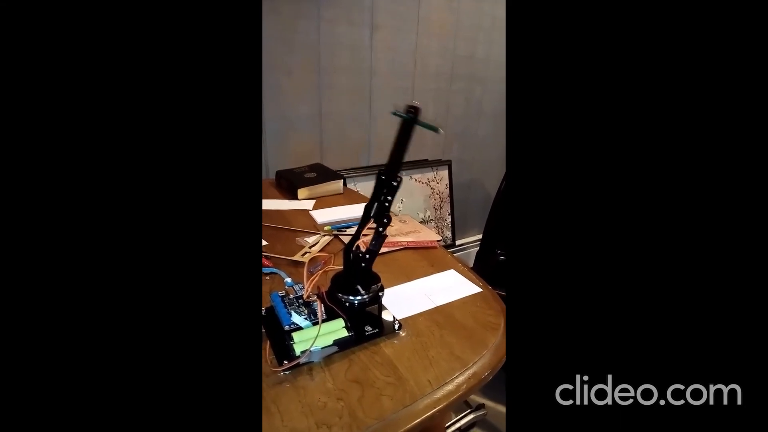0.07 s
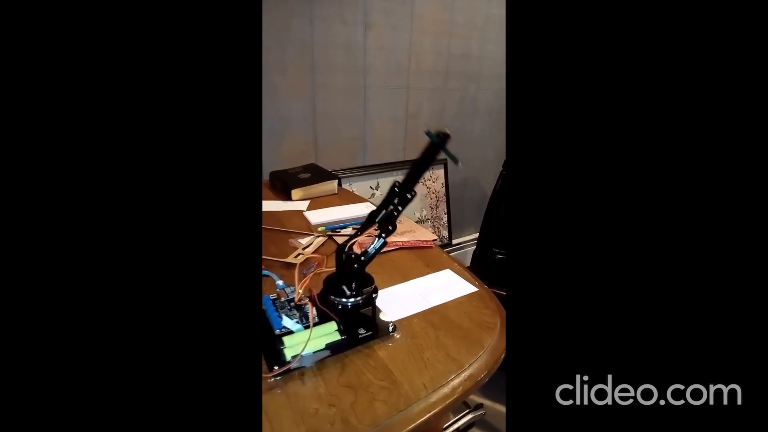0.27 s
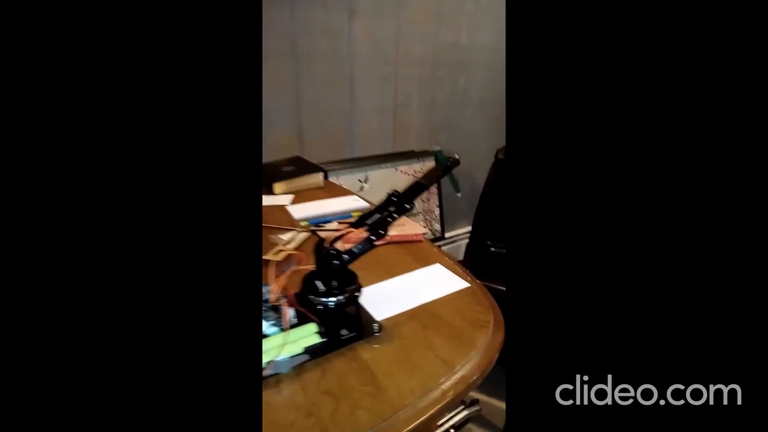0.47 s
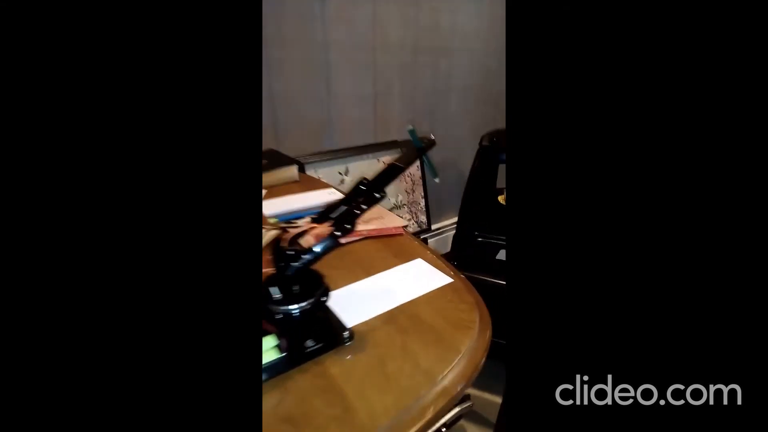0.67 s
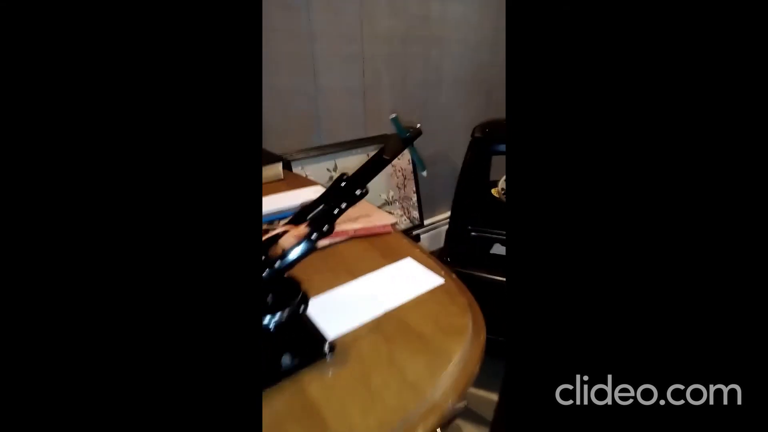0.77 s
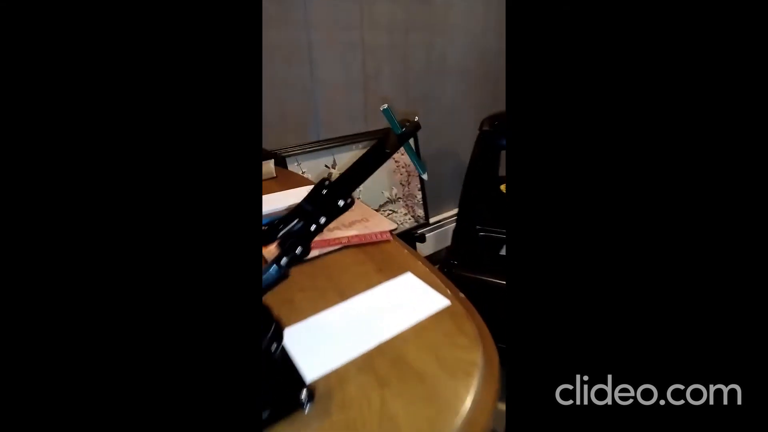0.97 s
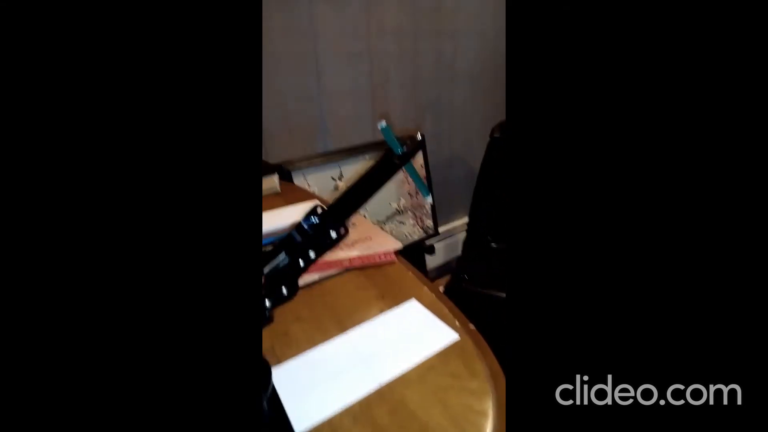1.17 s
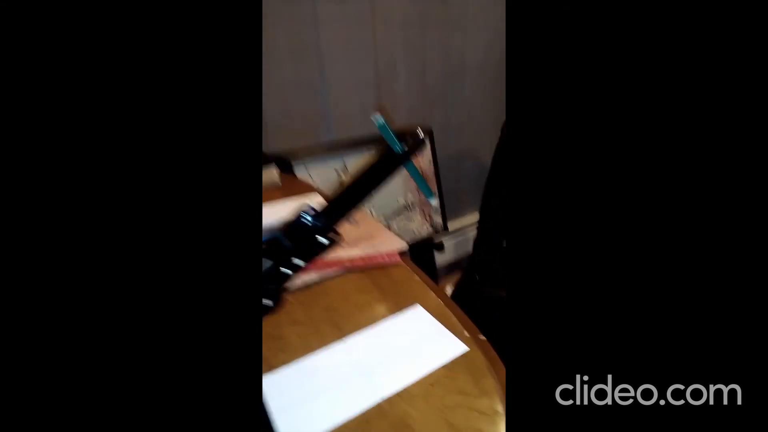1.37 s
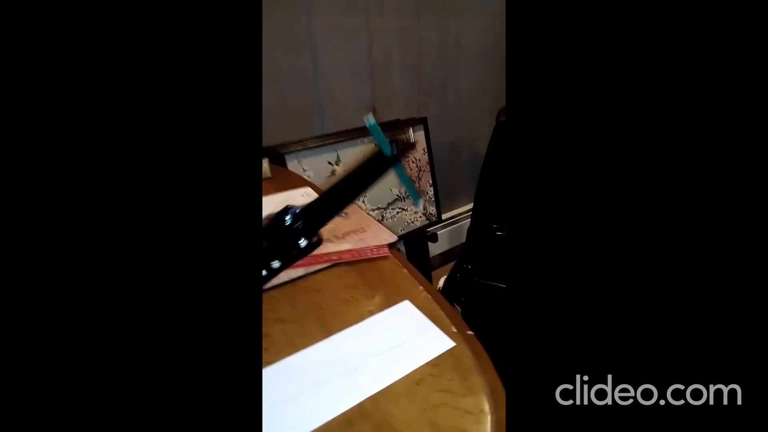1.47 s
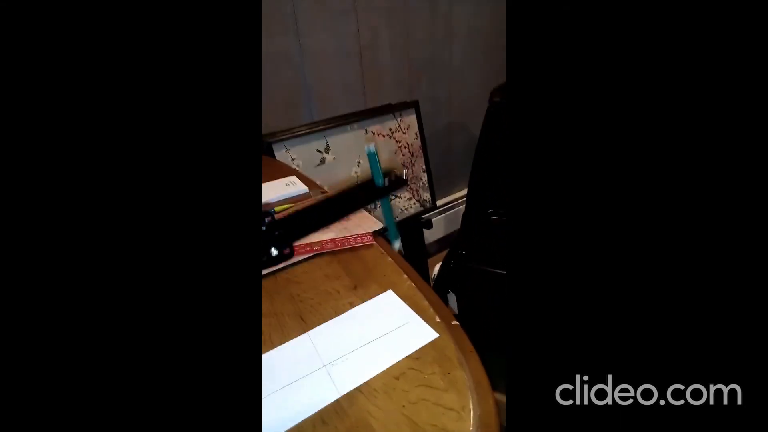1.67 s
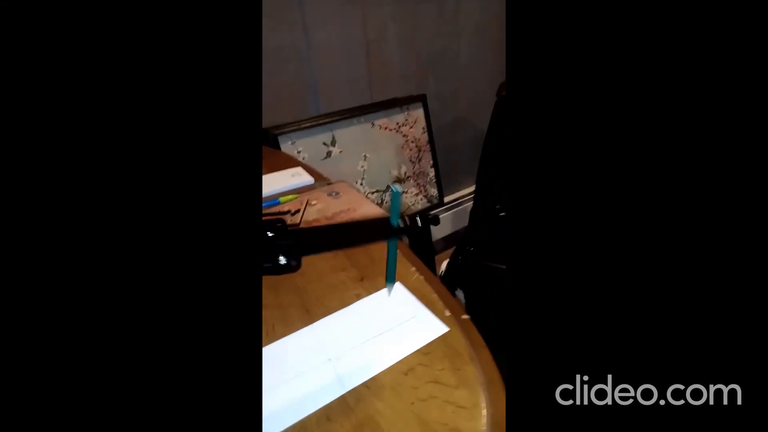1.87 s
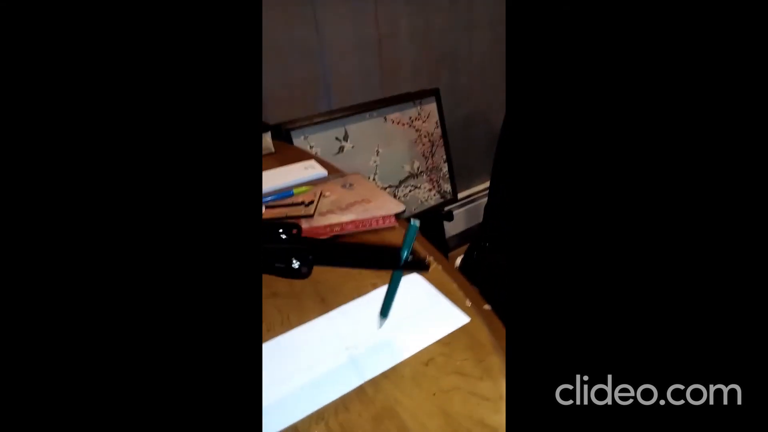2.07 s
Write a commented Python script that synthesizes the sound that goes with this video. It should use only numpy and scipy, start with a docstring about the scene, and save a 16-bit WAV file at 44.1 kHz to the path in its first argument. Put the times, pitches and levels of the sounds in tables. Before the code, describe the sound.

Servo motors buzz in a high, short burst as a small robot arm moves close to the microphone in a quiet room. After a lull with faint rustling and soft knocks, a nearer servo starts with a tick and grinds louder.

```python
"""Small servo motors move a desktop robot arm, close to a phone in a quiet room with a soft hiss.
First two servos end a move together: their gear teeth click hundreds of times a second and make the
plastic case ring. Then the arm drifts with a faint whistle, a rustle and three soft knocks on the table.
Last, a nearer and louder servo twitches with a bright tick, knocks the table and grinds away."""
import sys
import numpy as np
from scipy import signal
from scipy.fft import rfft, irfft, next_fast_len
from scipy.io import wavfile
from scipy.ndimage import uniform_filter1d

SR = 44100
rng = np.random.default_rng(int(sys.argv[2]) if len(sys.argv) > 2 else 0)


def wrap_up_sound(samples):
    """Save the sound to the file named by the first command line argument, as 16-bit audio."""
    columns = np.atleast_2d(samples).T
    # keep every value between -1 and 1, then stretch to whole-number steps
    tamed = np.clip(columns, -1, 1)
    steps = np.round(tamed * 32767).astype(np.int16)
    wavfile.write(sys.argv[1], SR, steps)


N = 93712


def undb(db):
    """Turns decibels into a volume factor."""
    return 10 ** (np.asarray(db) / 20)


def unit(x):
    """Scales a sound to an average power of 1."""
    return x / np.sqrt(np.mean(x ** 2))


def curve(table, col=1):
    """Joins the dots of a time table's column, giving one value per sample."""
    rows = np.array(table)
    return np.interp(np.arange(N) / SR, rows[:, 0], rows[:, col])


def loudness(table):
    """Volume that follows a time table's levels; silent before and after it."""
    t = np.arange(N) / SR
    return undb(curve(table)) * (t >= table[0][0]) * (t <= table[-1][0])


def wander(per_s):
    """A smooth random drift, about 1 in size."""
    span = int(SR / per_s)
    return unit(uniform_filter1d(uniform_filter1d(rng.standard_normal(N), span), span))


def colour(x, tone):
    """Makes some pitches stronger than others; the bass fades out below the first row."""
    rows, size = np.array(tone), next_fast_len(N)
    hz = np.maximum(np.fft.rfftfreq(size, 1 / SR), 1)
    db = np.interp(np.log(hz), np.log(rows[:, 0]), rows[:, 1])
    db -= 24 * np.maximum(np.log2(rows[0, 0] / hz), 0)
    return unit(irfft(rfft(x, size) * undb(db), size)[:N])


def ring(x, hz, width_hz):
    """Keeps only the pitches around hz."""
    band = signal.butter(2, [hz - width_hz / 2, hz + width_hz / 2], "band", fs=SR, output="sos")
    return unit(signal.sosfiltfilt(band, x))


def hiss():
    """The steady, soft noise of the room."""
    # tone of the hiss: (pitch [Hz], relative level [dB])
    tone = [(20, 2), (60, -11.5), (130, -6.5), (250, -2.5), (700, -10), (2000, -17.5), (6500, -15.5),
            (7600, -18), (15600, -24)]
    return undb(-65) * colour(rng.standard_normal(N), tone)


def rustle():
    """Soft noise in which each octave flickers on its own."""
    # how the rustle swells and fades: (time [s], level [dB], treble boost [dB])
    swells = [(0, -62.5, 3), (.22, -61, -5), (.41, -52.5, -12), (.47, -64.5, 4), (.53, -59, -2),
              (.6, -54.5, -4), (.72, -55, -3.5), (.83, -54, -4), (.93, -84, 16.5), (1.02, -57, -1.5),
              (1.1, -62.5, -4), (1.27, -63.5, -4.5), (1.44, -62, 3), (1.48, -54, 2), (1.53, -50, -9),
              (1.7, -54, 12), (1.9, -58, -41), (2.12, -76, -7)]
    # tone of the rustle: (pitch [Hz], relative level [dB])
    tone = [(35, -48), (60, -18), (118, -24.5), (193, -4), (504, -6.5), (672, -11), (744, -4.5), (895, -10),
            (2440, -4), (3250, -10), (5310, -7), (8000, -16), (10400, -23), (17600, -120)]
    flicker_db, noise = 1.8, 0
    for hz in 90 * 2. ** np.arange(7):
        octave = ring(rng.standard_normal(N), hz, width_hz=hz * .7) * np.sqrt(hz)
        noise += octave * undb(flicker_db * wander(per_s=22))
    noise = colour(noise, tone)
    treble = signal.sosfiltfilt(signal.butter(2, 2900, "high", fs=SR, output="sos"), noise)
    noise += treble * (undb(curve(swells, col=2)) - 1)
    return noise * undb(curve(swells))


def room_echo(x):
    """The room answers with a faint echo that dies away quickly."""
    t, fade_s = np.arange(int(.4 * SR)) / SR, .099
    tail = rng.standard_normal(len(t)) * 1000 ** (-t / fade_s)
    return undb(-15.5) * signal.fftconvolve(x, tail / np.linalg.norm(tail))[:N]


def whistle():
    """A narrow, wavering band of noise, heard while the arm drifts."""
    # path of the whistle: (time [s], level [dB], pitch [Hz])
    path = [(0.44, -57, 2430), (0.476, -68, 2450), (0.62, -63.5, 2495), (0.676, -67, 2480),
            (0.686, -65.5, 2470), (0.788, -62, 2404), (0.906, -62.5, 2480), (0.934, -69, 2560),
            (0.984, -60.5, 2560), (1.132, -63, 2518), (1.182, -67, 2490), (1.214, -67, 2490),
            (1.302, -63.5, 2453), (1.308, -85, 2530), (1.428, -81, 2500), (1.44, -67, 2480)]
    width_hz, flicker_db = 70, 1.5
    smoothing = [1, -np.exp(-np.pi * width_hz / SR)]
    slow = [unit(signal.lfilter([1], smoothing, rng.standard_normal(N))) for _ in range(2)]
    angle = 2 * np.pi * np.cumsum(curve(path, col=2)) / SR
    band = slow[0] * np.cos(angle) + slow[1] * np.sin(angle)  # lifts slow noise up to the pitch
    return unit(band * undb(flicker_db * wander(per_s=25))) * loudness(path)


def table_knocks():
    """Dull blows make the table top ring."""
    # blows on the table: (time [s], peak level [dB])
    blows = [(0.596, -50.5), (0.816, -53), (1.004, -54.5), (1.463, -42.5), (1.469, -38), (1.476, -37),
             (1.481, -38.5), (1.506, -45.5)]
    # notes of the table top: (pitch [Hz], relative level [dB], time to fade by 60 dB [s])
    notes = [(221.4, -3.5, 0.12), (310, 1.5, 0.041), (400, -5, 0.024), (506, 2, 0.024), (924, -6.5, 0.035)]
    t, pushes = np.arange(int(.3 * SR)) / SR, np.zeros(N)
    for time_s, db in blows:
        pushes[int(time_s * SR)] = undb(db)
    thud = sum(undb(db) * np.sin(2 * np.pi * hz * t) * 1000 ** (-t / fade_s) for hz, db, fade_s in notes)
    thud = signal.sosfilt(signal.butter(2, 140, "high", fs=SR, output="sos"), thud)
    return signal.fftconvolve(pushes, thud / np.abs(thud).max())[:N]


def gear_tick():
    """One bright tick as the gears take up their slack."""
    start_s, decay_s = 1.451, .00098
    t = np.arange(N) / SR - start_s
    bright = ring(rng.standard_normal(N), hz=12500, width_hz=5500)
    return undb(-42) * bright * np.exp(-np.maximum(t, 0) / decay_s) * (t >= 0)


def smear(x, longest_s=.005):
    """Each pitch takes its own time to cross the case and arm, so clicks lose their edge."""
    size = next_fast_len(N + 4096)
    delay_s = longest_s * np.interp(np.linspace(0, 120, size // 2 + 1), np.arange(121), rng.random(121))
    return irfft(rfft(x, size) * np.exp(-2j * np.pi * np.cumsum(delay_s) * SR / size), size)[:N]


def case_notes(x, notes, flicker_db=2.8):
    """The case rings at its own pitches; each comes and goes at random, as under a shifting load."""
    ringing = 0
    for hz, width_hz, db in notes:
        b, a = signal.iirpeak(hz, hz / width_hz / 1.5, SR)
        ringing += undb(db + flicker_db * wander(per_s=30)) * unit(signal.filtfilt(b, a, x))
    return ringing


def gears(teeth_per_s, jitter, scatter_db, grind_db):
    """Each tooth makes a click, uneven in time and strength, then a puff of grinding."""
    passed = np.cumsum(teeth_per_s * (1 + jitter * wander(per_s=60))) / SR  # teeth gone by so far
    teeth = np.arange(1, int(passed[-1]) + 1)
    hits = np.interp(teeth, passed, np.arange(N))
    strength = undb(scatter_db * rng.standard_normal(N // 20))
    nearby = np.floor(hits)[:, None] + np.arange(-7, 9)  # a hit falls between samples: spread it over 16
    gap = nearby - hits[:, None]
    pulses = strength[teeth, None] * np.sinc(gap) * np.cos(gap * np.pi / 16) ** 2
    clicks = np.zeros(N)
    np.add.at(clicks, np.clip(nearby, 0, N - 1).astype(int), pulses)
    puffs = strength[passed.astype(int)] * np.exp(-(passed % 1) / .6)
    grind = rng.standard_normal(N) * puffs
    return unit(smear(unit(clicks) + undb(grind_db) * unit(grind)))


def servo_pair():
    """Two servos at slightly different speeds take turns being louder; their teeth ring the case."""
    # the first move: (time [s], level [dB], relative level of the low ring [dB])
    move = [(0.0, -53.5, -22), (0.028, -47.5, 0.5), (0.072, -49, -14), (0.088, -45, -6.5),
            (0.114, -52, -11), (0.134, -50.5, -3), (0.158, -44.5, -8), (0.174, -48.5, 0),
            (0.198, -48.5, -31), (0.22, -45, 0), (0.252, -47.5, -20), (0.29, -44, -12), (0.326, -49, -29),
            (0.346, -40.5, -17), (0.36, -39.5, -35), (0.37, -47, -26), (0.376, -45.5, -50),
            (0.408, -40.5, -16), (0.436, -51, -14), (0.47, -68, -12)]
    # the two servos: (speed [teeth per s], relative level [dB])
    servos = [(780, 1), (714.5, -2)]
    # broad tone of the case: (pitch [Hz], relative level [dB])
    tone = [(1500, -41), (2300, -20), (2700, -12.5), (3400, -11.5), (4300, -6.5), (5200, -6), (6300, -3),
            (7200, -5), (8800, -8), (9400, -12), (11500, -12), (12300, -20), (15500, -27)]
    # notes of the case: (pitch [Hz], width [Hz], relative level [dB])
    notes = [(4240, 61, -20), (5034, 110, -13), (5390, 110, -11.5), (6404, 37, -15.5), (6990, 70, -14),
             (9170, 110, -22)]
    balance_db, teeth = 3 * wander(per_s=27), 0
    for side, (speed, db) in zip((1, -1), servos):
        teeth += undb(db + side * balance_db) * gears(speed, jitter=.005, scatter_db=2, grind_db=3)
    case = colour(teeth, tone) + case_notes(teeth, notes)
    low_ring = undb(curve(move, col=2)) * ring(teeth, hz=3020, width_hz=480)
    return (case + low_ring) * loudness(move)


def near_servo():
    """A rough servo under load; its teeth make the case ring high and loud."""
    # the second move: (time [s], level [dB], relative low ring [dB], relative high ring [dB])
    move = [(1.436, -84, -13, -8), (1.448, -42, -16, -11.5), (1.464, -44, -16, -17), (1.474, -74, 11, -14),
            (1.482, -81, -11, 10), (1.496, -32.5, -39, -17), (1.506, -36, -24, -8),
            (1.512, -33.5, -21.5, -24), (1.564, -40.5, -5, -5), (1.574, -36.5, -8, -18),
            (1.632, -37, -21, -16), (1.658, -33, -9.5, -15.5), (1.684, -38, -26, -34),
            (1.692, -37, -23, -37), (1.702, -34.5, -20, -21), (1.742, -35, -13.5, -12.5),
            (1.776, -34, -51, -38), (1.798, -30.5, -17, -12.5), (1.818, -31.5, -16, -32),
            (1.844, -33, -50, -14.5), (1.878, -28.5, -15.5, -20), (1.912, -37, -18, -17),
            (1.944, -29.5, -14, -15.5), (1.956, -37, -17, -12.5), (1.992, -28, -34, -16),
            (2.022, -34.5, -11, -10.5), (2.036, -32.5, -16.5, -9), (2.125, -34.5, -19, -17)]
    # how fast the gears run: (time [s], speed [teeth per s])
    speed = [(1.44, 418), (1.49, 753), (1.56, 690), (1.62, 590), (1.72, 720), (1.8, 700), (1.95, 685),
             (2.12, 624)]
    # broad tone of the case: (pitch [Hz], relative level [dB])
    tone = [(1500, -43.5), (2050, -52.5), (2350, -18), (2700, -24), (3500, -19.5), (4200, -19), (4600, -21),
            (5000, -14.5), (5800, -12.5), (6200, -6.5), (7000, -0.5), (7500, -6), (8600, -16), (9400, -27),
            (10200, -47), (13000, -45), (13700, -61), (15500, -48)]
    # notes of the case: (pitch [Hz], width [Hz], relative level [dB])
    notes = [(3880, 82, -34), (4250, 40, -27), (4920, 94, -27), (5670, 54, -24), (6227, 105, -10.5),
             (6400, 160, -12.5), (6707, 87, -8.5)]
    teeth = gears(curve(speed), jitter=.04, scatter_db=1.2, grind_db=5)
    case = colour(teeth, tone) + case_notes(teeth, notes)
    low_ring = undb(curve(move, col=2)) * ring(teeth, hz=3130, width_hz=560)
    high_ring = undb(curve(move, col=3)) * ring(teeth, hz=11700, width_hz=2100)
    buzz = undb(-37.5) * ring(teeth, hz=1030, width_hz=920)  # the lowest tones of the teeth
    return (case + low_ring + high_ring + buzz) * loudness(move)


def scene():
    """The arm and the room reach one microphone, which feeds both channels."""
    arm = servo_pair() + near_servo() + whistle() + table_knocks() + gear_tick()
    mix = arm + room_echo(arm) + rustle() + hiss()
    return np.array([mix, mix])


def record(dry):
    """The phone cuts off the highest treble."""
    top_hz = 15600
    return signal.sosfilt(signal.ellip(10, .2, 80, top_hz, fs=SR, output="sos"), dry)


dry = scene()
out = record(dry)
wrap_up_sound(out)
```